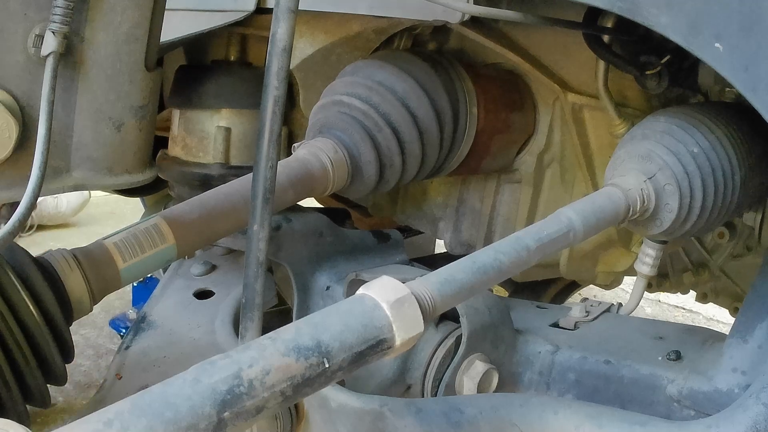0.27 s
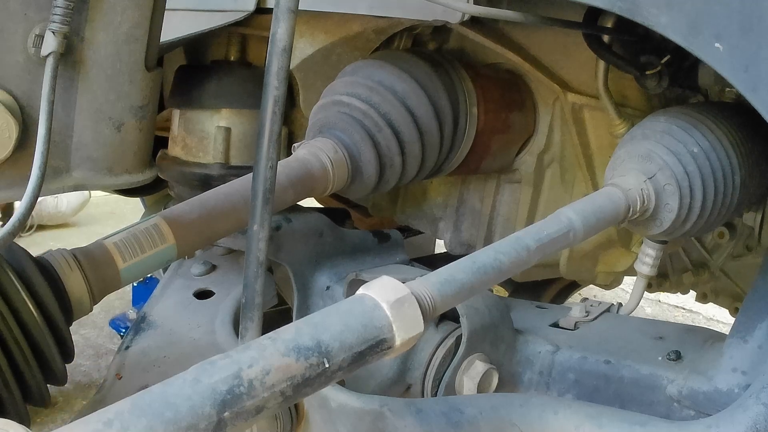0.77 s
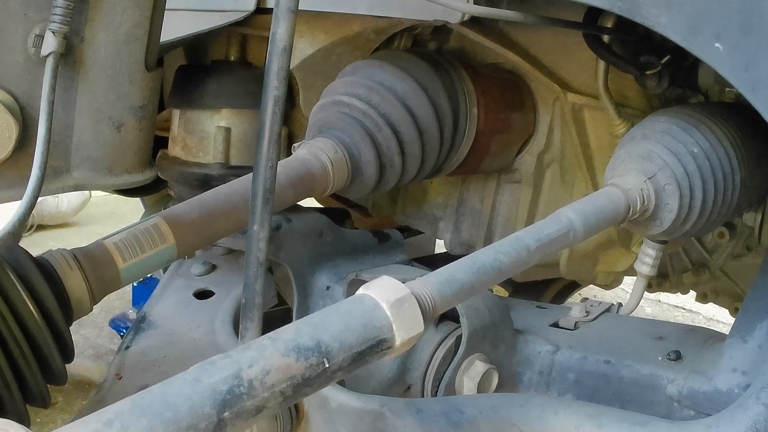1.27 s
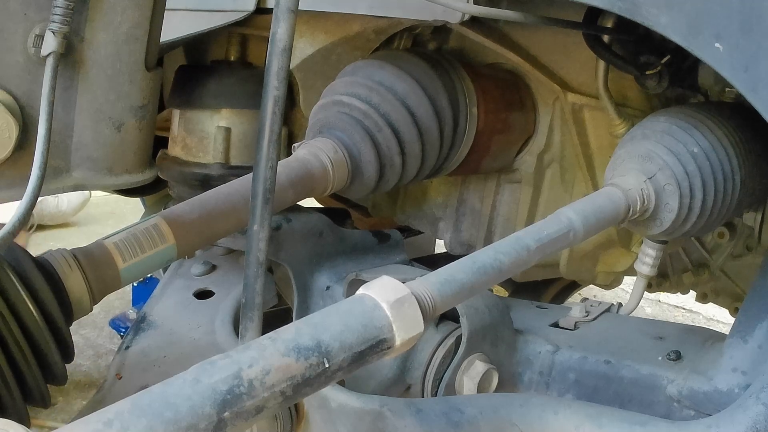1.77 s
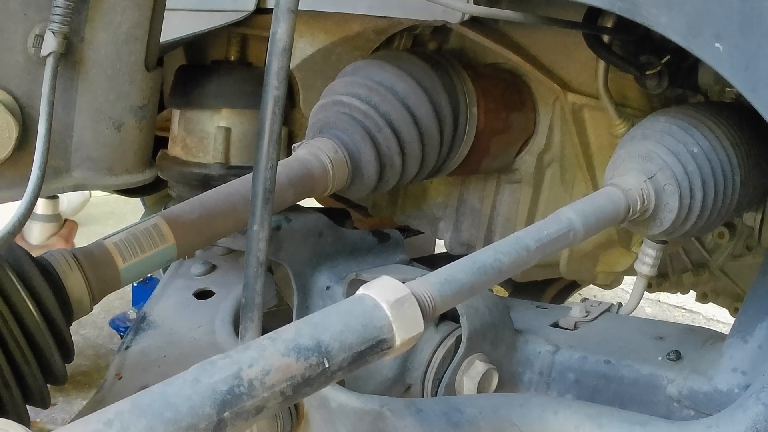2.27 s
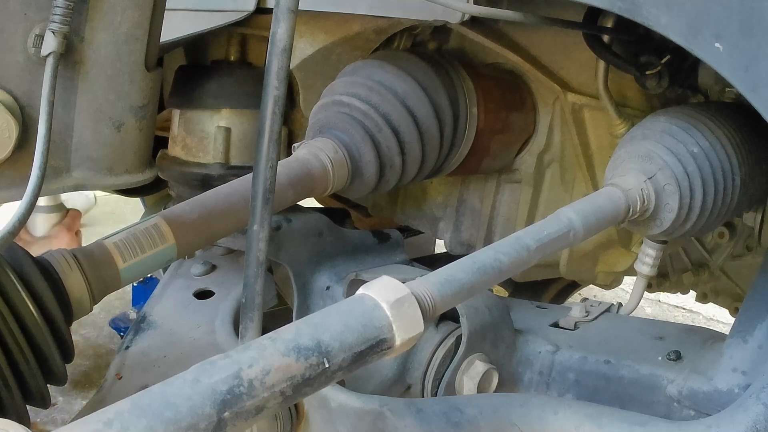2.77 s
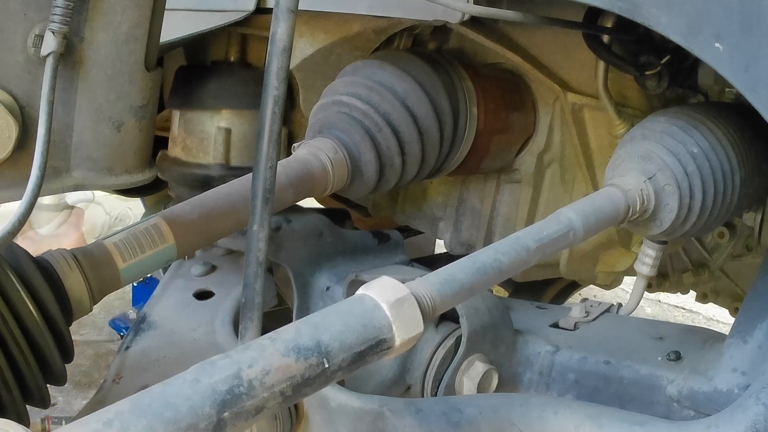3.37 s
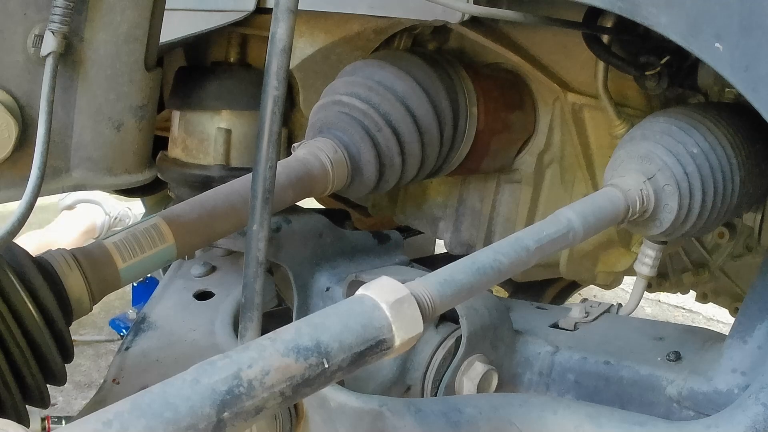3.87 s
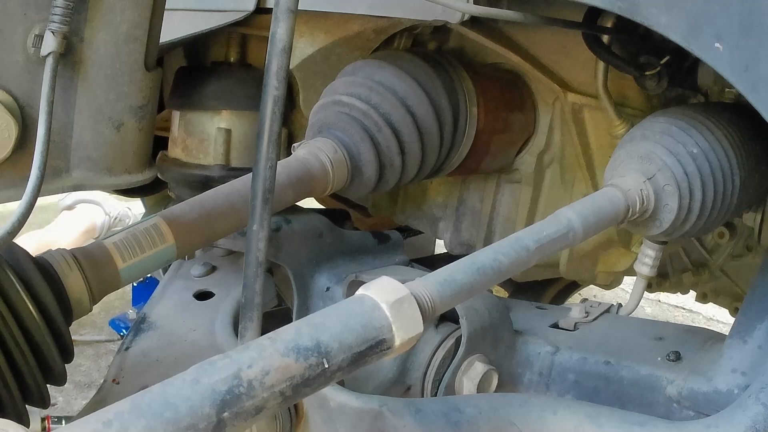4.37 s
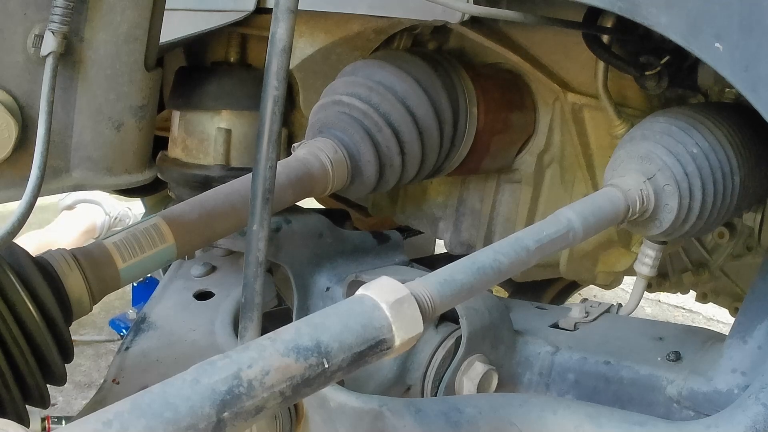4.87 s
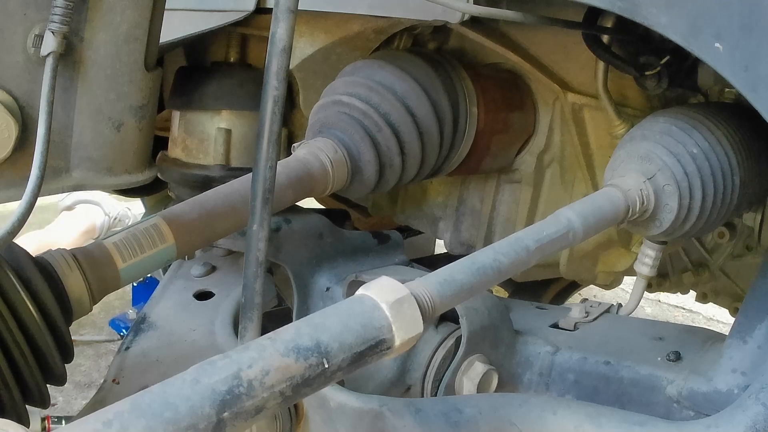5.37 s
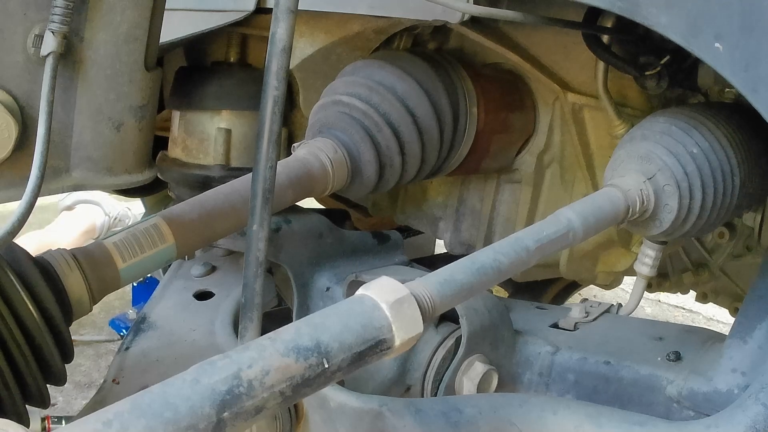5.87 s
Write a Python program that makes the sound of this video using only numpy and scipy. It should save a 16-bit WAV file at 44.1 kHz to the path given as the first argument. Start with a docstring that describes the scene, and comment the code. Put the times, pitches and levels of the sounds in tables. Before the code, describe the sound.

A heavy power wrench is shifted across the floor beneath a raised vehicle, close to the microphone. Light bumps build to a loud clatter at about 0.5 seconds, with hollow housing knocks, steel chatter and gritty scraping until 1 second. A dull thud follows at 1.1, and a loose socket gives two thin, high pings at 1.4 and 1.6. After a pause, the wrench knocks hard again at 2.6 seconds, then bumps and drags softly until 3.3. Small steel parts clink from 3.4, peaking near 4.1 with a thud that leaves a chassis bar and panel ringing faintly for about a second. A few lighter clinks and a soft thud come around 5.2. The impacts have short, tight reflections. Low outdoor rumble and microphone hiss run throughout, while a faint distant hiss swells from about 3.5 seconds and holds to the end at 6.

```python
"""Close knocks and scrapes of a heavy wrench dragged about under a raised vehicle: its hollow housing booms and
its steel nose chatters. Near the microphone a loose socket pings, small steel parts clink, and a chassis bar
and panel ring after a blow, all with short reflections between floor and vehicle. Low outdoor rumble and
microphone hiss lie under all; a far hiss swells towards the end."""
import sys
import numpy as np
from scipy import signal
from scipy.io import wavfile
from scipy.ndimage import uniform_filter1d, minimum_filter1d

SR = 44100
rng = np.random.default_rng(int(sys.argv[2]) if len(sys.argv) > 2 else 0)


def unload_audio(sound):
    """Save the sound as a 16-bit wav file, at the path given as the first command line argument."""
    columns = np.transpose(np.atleast_2d(sound))
    # keep every value between -1 and 1, then stretch to whole-number steps
    steps = np.round(np.clip(columns, -1, 1) * 32767)
    wavfile.write(sys.argv[1], SR, steps.astype(np.int16))


N = 269447


def gain_of(db):
    """Decibels to amplitude."""
    return 10 ** (np.asarray(db) / 20)


def unit_rms(x):
    """Scales to rms 1."""
    return x / np.sqrt(np.mean(x ** 2) + 1e-20)


def add(mix, start_s, sound):
    """Mixes a sound in at a time."""
    part = mix[round(start_s * SR):][:len(sound)]
    part += sound[:len(part)]


def response(peaks):
    """Causal impulse response of energy 1 from steep resonances (centre_hz, width_hz, relative_db)."""
    f = np.abs(np.fft.fftfreq(8192, 1 / SR))
    power = sum(gain_of(db) ** 2 / (1 + (2 * (f - hz) / width) ** 2) ** 2 for hz, width, db in peaks)
    # little bass, and a contact lasts too long for the top treble
    radiated = f ** 2 / (f ** 2 + 160.0 ** 2) / (1 + (f / 11000.) ** 6)
    log_gain = np.log(power * radiated + 1e-10) / 2
    minimum_phase = -signal.hilbert(log_gain).imag
    impulse = np.fft.ifft(np.exp(log_gain + 1j * minimum_phase)).real[:4096]
    return impulse / np.linalg.norm(impulse)


def contact(t60):
    """Force envelope of a contact: a rise, softer for long contacts, a stretch of chatter, then decay."""
    t, chatter_s = np.arange(SR // 4) / SR, 0.14 * t60
    rise = 1 - np.exp(-t / (0.31 * chatter_s))
    return rise * gain_of(-60 * np.maximum(t - chatter_s, 0) / max(t60, .01))


def chatter(count, lumpy_db):
    """Noise whose strength jumps from millisecond to millisecond, as metal skipping on a hard face."""
    lumps = unit_rms(uniform_filter1d(rng.standard_normal(count), size=60))
    return unit_rms(rng.standard_normal(count) * gain_of(lumpy_db * lumps))


def free_ring(modes, t60_share=1):
    """One second of a struck object's ring: decaying modes, each beating at its own rate."""
    out, t = np.zeros(SR), np.arange(SR) / SR
    for hz, db, t60 in modes:
        tone = np.sin(2 * np.pi * (hz * t + rng.random()))
        beating = 1 + .5 * np.sin(2 * np.pi * (rng.uniform(2.6, 32.6) * t + rng.random()))
        out += gain_of(db - 60 * t / (t60_share * t60)) * tone * beating
    return out


# Resonances of the wrench and the grit under it: centre_hz, width_hz, relative_db
STEEL_NOSE = [(1030, 340, 5), (1223, 71, 3), (1362, 108, 9), (1793, 39, 6), (2220, 78, -5), (2400, 120, -9),
              (2930, 165, 2.5), (3800, 140, -12), (1980, 2780, -0.5)]
HOUSING_RING = [(622, 48, 0), (665, 50, -6), (748, 60, -16), (840, 200, -22)]
HOUSING_THUMP = [(227, 123, -4), (313, 55, 1), (394.7, 45, 1.5), (454, 35, 3.5), (483, 92, -1.5)]
COARSE_GRIT = [(5300, 120, -22.5), (6150, 680, 1), (7060, 510, 0), (5800, 17000, 0.5)]
FINE_GRIT = [(10100, 200, 6), (11320, 900, -3.5), (14000, 1000, -33), (10800, 3300, -11)]
FINE_GRIT_DB = -4.5  # against the coarse grit


def wrench():
    """On the floor, close to the microphone: knocks and slides excite nose, housing and grit."""
    parts = (STEEL_NOSE, HOUSING_RING, HOUSING_THUMP, COARSE_GRIT, FINE_GRIT)
    knock_power, blows = wrench_knocks()
    out = np.zeros(N)
    for peaks, power, blow in zip(parts, knock_power + wrench_slides(), blows):
        drive = np.sqrt(power) * chatter(count=N, lumpy_db=3.0) + blow
        out += signal.oaconvolve(drive, response(peaks))[:N]
    return out


# Knocks of the wrench: start_s, nose_db, ring_db, thump_db, grit_db, t60_s
WRENCH_KNOCKS = [(.0764, -53.5, -33.5, -44.5, -72, 0.18), (.112, -54, -56, -49, -73, .08),
                 (0.136, -48.5, -45, -49, -70, 0.079), (.201, -55, -40, -49, -74, 0.091),
                 (.285, -40.5, -43, -44, -73, 0.11), (.316, -37.5, -25, -31.5, -71, 0.16),
                 (0.3362, -49, -24, -23, -64, 0.17), (0.4747, -36.5, -16.5, -24, -57, 0.19),
                 (0.489, -26.5, -24, -28, -39.5, 0.17), (.5054, -28.5, -23, -25, -32.5, 0.22),
                 (.5334, -9.5, 1.5, -18, -36, 0.04), (0.5402, -13, -10.5, -13, -27, 0.12),
                 (.5536, -13.5, -6, -14, -44, 0.17), (.563, -37, 0, -18.5, -35, 0.053),
                 (0.676, -42, -30, -33, -48.5, 0.1), (.6896, -28, -24, -34, -47, 0.12),
                 (.6994, -28, -14, -25, -51, 0.15), (.7184, -29, -12, -22, -35, 0.25),
                 (.7347, -21.5, -22, -27, -19, 0.082), (0.748, -31, -18, -21, -23.5, 0.068),
                 (.764, -43, -19, -34, -48, 0.14), (.7915, -33, -17.5, -29, -34.5, 0.13),
                 (.812, -30.5, -21.5, -35, -48, 0.22), (.8284, -21, -27, -22, -45, 0.031),
                 (.8714, -39, -27, -35, -52, 0.22), (.8907, -28, -23.5, -27, -40, 0.11),
                 (.936, -38, -29, -34, -48, 0.1), (.956, -36.5, -23.5, -50, -41.5, 0.067),
                 (1.266, -52, -67, -66, -61.5, .1), (1.303, -56, -60, -66, -65, 0.12),
                 (2.554, -20.5, -12.5, -29.5, -60, .11), (2.589, -23.5, -12, -13.5, -37, 0.074),
                 (2.6131, -35, -28, -17.5, -62, .046), (2.626, -47, -31, -20, -70, 0.026),
                 (2.6659, -45, -36, -28.5, -75, 0.24), (2.705, -37, -24.5, -34, -71, 0.061),
                 (2.807, -52, -33, -37, -75, 0.21), (2.8288, -43, -21, -30, -70, 0.27),
                 (2.8486, -37.5, -20, -24, -65, .12), (2.8709, -45, -28, -24, -73, 0.066),
                 (3.088, -55, -36, -30, -85, 0.35), (3.1125, -38, -17.5, -23, -75, 0.026),
                 (3.1219, -47, -28, -24.5, -77, 0.12), (3.146, -64, -52, -31.5, -79, 0.04),
                 (3.271, -59, -31.5, -26.5, -76, 0.094)]
# Share of a knock's t60 in each part: nose, ring, thump, coarse_grit, fine_grit
T60_SHARES = [0.46, 0.32, 0.79, 0.69, 0.59]
# Time over which the housing spreads the energy of a clean blow: ring_s, thump_s
BLOW_SPREAD_S = [0.0068, 0.01]


def wrench_knocks():
    """Each knock gives chatter power to all five parts and one clean blow to the housing."""
    power, blows = np.zeros((2, 5, N))
    housing = slice(1, 3)  # ring and thump
    push = np.hanning(60) / 30  # a blow lasts about a millisecond
    for start_s, nose_db, ring_db, thump_db, grit_db, t60 in WRENCH_KNOCKS:
        levels_db = (nose_db, ring_db, thump_db, grit_db, grit_db + FINE_GRIT_DB)
        for part, db, share in zip(power, levels_db, T60_SHARES):
            add(part, start_s, (gain_of(db) * contact(share * t60)) ** 2)
        for part, db, spread_s in zip(blows[housing], levels_db[housing], BLOW_SPREAD_S):
            add(part, start_s, rng.choice([-1, 1]) * gain_of(db) * np.sqrt(spread_s * SR) * push)
    power[housing] *= .2  # the heavy housing takes up little of a knock's fine chatter
    return power, blows


# Drags across the floor, one list a stroke: time_s, nose_db, ring_db
WRENCH_SLIDES = [
    [(.04, -65, -45.5), (.14, -67, -63), (.26, -82, -57.5), (.44, -75, -47.5)],
    [(.57, -30, -31), (.652, -51.5, -43), (.7, -35, -22)],
    [(.76, -49, -32.5), (.828, -32, -33), (.87, -42.5, -33), (.966, -37, -40.5), (1.04, -74, -55)],
    [(2.6, -48, -44), (2.766, -66, -45.5), (2.894, -58.5, -50), (2.98, -52.5, -58)],
    [(3.05, -59.5, -48), (3.174, -78, -56), (3.34, -81, -88)],
]


def wrench_slides():
    """Dragging gives sustained chatter power: the thump follows the ring, the grit follows the nose."""
    power = np.zeros((5, N))
    for stroke in WRENCH_SLIDES:
        time_s, nose_db, ring_db = np.transpose(stroke)
        thump_db, grit_db = ring_db + 1, nose_db - 19
        t = np.arange(time_s[0], time_s[-1], 1 / SR)
        fade = signal.windows.tukey(len(t), .1)
        for part, db in zip(power, (nose_db, ring_db, thump_db, grit_db, grit_db + FINE_GRIT_DB)):
            add(part, time_s[0], (gain_of(np.interp(t, time_s, db)) * fade) ** 2)
    return power


# Small steel parts touching: start_s, low_db, low_hz, bright_db, bright_hz
STEEL_CLINKS = [(0.2567, -45.5, 1300, -74, 5500), (1.0817, -48, 1330, -55.5, 6300),
                (1.4421, -56, 1690, -53, 9800), (1.636, -50, 1000, -51, 13500),
                (2.697, -38, 2010, -46, 4630), (2.9173, -39.5, 2380, -45.5, 4900),
                (3.004, -60, 2320, -59, 10800), (3.366, -59, 1400, -64, 10600),
                (3.378, -50, 3640, -44, 9300), (3.3985, -35.5, 1900, -37, 6300),
                (3.4162, -47, 1480, -56, 13300), (3.475, -39, 1080, -59, 6500),
                (3.501, -27, 1910, -44, 6100), (3.57, -42, 2370, -64, 4680),
                (3.588, -59, 2060, -52.5, 8500), (3.62, -46, 2680, -53, 11700),
                (3.704, -40.5, 2360, -44.5, 4100), (3.943, -46.5, 2180, -49, 6600),
                (3.9654, -29, 2130, -28.5, 9000), (3.9786, -26.5, 1850, -33, 5700),
                (4.043, -32, 1800, -50, 6420), (4.054, -24.5, 2050, -39, 5700),
                (4.0764, -18.5, 2080, -24.5, 5060), (5.13, -41.5, 1470, -65, 4450),
                (5.142, -48, 1400, -69, 4450), (5.162, -44.5, 1550, -54, 6610),
                (5.1892, -40.5, 2570, -39, 10800), (5.259, -48, 4600, -56, 12000),
                (5.3052, -45.5, 1510, -48.5, 10500)]


def steel_clinks(t60=0.059):
    """Close by, a short chatter excites a low and a bright ring; the bright one dies first."""
    out = np.zeros(N)
    for start_s, low_db, low_hz, bright_db, bright_hz in STEEL_CLINKS:
        low = response([(low_hz, 600, 0), (1.1 * low_hz, 2500, -7)])
        bright = response([(bright_hz, 1200, 0), (bright_hz, 7000, -6)])
        for db, resonance, share in (low_db, low, 1), (bright_db, bright, .8):
            drive = chatter(count=SR // 4, lumpy_db=0.5) * contact(share * t60)
            add(out, start_s, gain_of(db) * signal.oaconvolve(drive, resonance))
    return out


# Modes of the socket: pitch_hz, relative_db, t60_s
SOCKET_MODES = [(5220, -9.5, 0.13), (10030, -2, 0.29), (14080, -7, 0.079)]
# Taps on it: start_s, level_db, t60_share
SOCKET_PINGS = [(1.444, -41.5, 0.39), (1.64, -34, 0.72)]


def socket_pings():
    """A loose socket near the microphone pings, dying sooner than it would if ringing freely."""
    out = np.zeros(N)
    for start_s, db, t60_share in SOCKET_PINGS:
        add(out, start_s, gain_of(db) * free_ring(SOCKET_MODES, t60_share))
    return out


# Modes of the chassis bar and of a small loose pin: pitch_hz, relative_db, t60_s
BAR_MODES = [(1034, -19, 2.5), (1351, -18, .9), (1459, -19, 1.0), (1556, -9, .4), (1787, -7, .35),
             (2067, -8, .7), (2137, -9, 1.2), (2186, 4, .14), (2293, -12, .7), (2476, -15, .8),
             (2640, -12, .5), (2929, -7, .65), (3009, -13, .8), (3219, -9, .6), (3478, -11, .65),
             (3644, -16, .8), (4860, 8, .1), (4995, 8, .1), (7424, -13, .25), (10130, -4, .18)]
PIN_MODES = [(13300, 0, .04), (13050, -4, .04)]
# Strikes on each: start_s, level_db
BAR_BLOWS = [(3.969, -46), (4.078, -40.5)]
PIN_RATTLES = [(3.367, -65), (3.43, -62), (3.44, -63), (3.475, -65), (3.992, -57), (4.012, -62),
               (4.03, -62), (4.052, -58), (4.065, -60)]


def bar_and_pin():
    """Struck metal under the vehicle: the bar rings on, the pin rattles in short, high ticks."""
    out = np.zeros(N)
    for modes, strikes in (BAR_MODES, BAR_BLOWS), (PIN_MODES, PIN_RATTLES):
        for start_s, db in strikes:
            add(out, start_s, gain_of(db) * free_ring(modes))
    return out


# Dull thuds: start_s, level_db, pitch_hz, t60_s
CHASSIS_THUDS = [(1.079, -21.5, 178, 0.067), (2.587, -13.5, 264, 0.065), (3.48, -33, 240, 0.067),
                 (3.508, -29, 246, 0.074), (4.075, -18.5, 226, 0.082), (5.162, -24, 120, 0.026)]


def chassis_thuds():
    """Thuds come through the chassis overhead, each one low mode that dies quickly."""
    out, t = np.zeros(N), np.arange(SR // 4) / SR
    for start_s, db, hz, t60 in CHASSIS_THUDS:
        add(out, start_s, gain_of(db - 60 * t / t60) * np.sin(2 * np.pi * hz * t))
    return out


# Resonant bands of the sheet metal: centre_hz, width_hz, relative_db
PANEL_BANDS = [(1460, 420, 11), (2260, 960, 9), (3020, 1300, -6), (990, 98, 4)]
# Blows on it: start_s, level_db, t60_s
PANEL_BLOWS = [(3.502, -53, 1.7), (3.6, -63, 1.3), (3.977, -49.5, 0.41), (4.08, -47, 1.13)]


def chassis_panel():
    """Sheet metal overhead answers a blow with a wash of modes too dense to tell apart."""
    drive, t = np.zeros(N), np.arange(SR) / SR
    for start_s, db, t60 in PANEL_BLOWS:
        add(drive, start_s, gain_of(db - 60 * t / t60) * rng.standard_normal(SR))
    return signal.oaconvolve(drive, response(PANEL_BANDS))[:N]


def underside_reflections(near, t60=0.088):
    """Short, dense reflections between floor and vehicle, arriving from 3 ms after the direct sound."""
    t = np.arange(SR // 4) / SR
    bounces = rng.choice([-1., 1.], len(t)) * (rng.random(len(t)) < .05)
    tail = bounces * gain_of(-60 * t / t60) * (t > .003)
    tail = signal.lfilter([1], [1, -.6], tail)  # bounces lose treble
    return signal.oaconvolve(near, tail / np.linalg.norm(tail))[:N]


# Spectrum of the outdoor rumble and microphone hiss: frequency_hz, relative_db
AIR_SPECTRUM = [(13, -42.5), (22, 2.5), (115, -6.5), (178, -17), (204, -14), (241, -20), (284, -19),
                (396, -25), (480, -26.5), (614, -30), (832, -33), (928, -33.5), (2370, -40.5), (2790, -41),
                (15800, -50)]
# Slow swell of the bass: time_s, boost_db
RUMBLE_SWELL = [(0, 2), (1.5, 2), (3, 3.5), (4, 4), (5, 4.5), (6.11, 3)]


def rumble_and_hiss(level_db=-36):
    """Outdoor rumble and the microphone's own hiss: noise with faint drifting patches and swelling bass."""
    frames, hz = N // 512 + 5, np.fft.rfftfreq(2048, 1 / SR)
    real, imag, patches = rng.standard_normal((frames, 1025, 3)).T
    patches = uniform_filter1d(patches, size=20, axis=0)  # across frequency
    patches_db = 1.4 * unit_rms(uniform_filter1d(patches, size=8, axis=1))  # across time
    curve_hz, curve_db = np.transpose(AIR_SPECTRUM)
    steady_db = np.interp(np.log(hz + 1), np.log(curve_hz + 1), curve_db)[:, None]
    boost_db = np.interp(np.arange(frames) * 512 / SR, *np.transpose(RUMBLE_SWELL))
    bass_db = boost_db / (1 + (hz[:, None] / 550.0) ** 2)
    spectra = (real + 1j * imag) * gain_of(steady_db + patches_db + bass_db)
    noise = signal.istft(spectra, nperseg=2048, noverlap=1536)[1][:N]
    return gain_of(level_db) * unit_rms(noise)


# Bands of the distant hiss: centre_hz, width_hz, relative_db
FAR_HISS_BANDS = [(2700, 190, 0), (3400, 840, 5), (4520, 600, -6), (5270, 300, -4), (5830, 610, 7),
                  (6960, 310, 4.5), (5000, 5100, 1)]


def far_hiss(full_db=-54, depth_db=29, start_s=3.42, rise_s=0.77):
    """Far from the microphone, a hiss in a few soft bands swells quickly, then levels off."""
    since_s = np.maximum(np.arange(N) / SR - start_s, 0)
    swell = gain_of(full_db - depth_db * np.exp(-since_s / rise_s))
    return swell * signal.oaconvolve(rng.standard_normal(N), response(FAR_HISS_BANDS))[:N]


def scene():
    """One microphone by the raised vehicle: close metal, its reflections and the outdoors behind."""
    near = wrench() + steel_clinks() + socket_pings() + bar_and_pin() + chassis_thuds() + chassis_panel()
    return (near + gain_of(-10) * underside_reflections(near) + rumble_and_hiss() + far_hiss())[None]


def record(dry):
    """A fast limiter holds the loudest knock at full scale; a steep low-pass cuts the top treble."""
    allowed_gain = np.minimum(1 / (np.abs(dry) + 1e-9), 1)
    held_gain = minimum_filter1d(allowed_gain, size=441, axis=1)  # 10 ms
    limited = dry * uniform_filter1d(held_gain, size=221, axis=1)
    low_pass = signal.firwin(511, cutoff=15950, window=("kaiser", 9), fs=SR)
    filtered = signal.oaconvolve(limited, low_pass[None], "same")
    return filtered / max(np.abs(filtered).max(), 1)


dry = scene()
out = record(dry)
unload_audio(out)
```